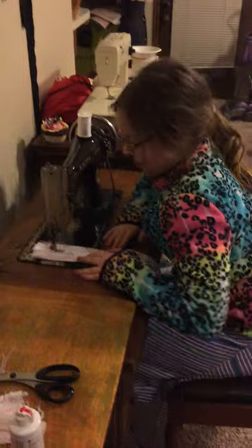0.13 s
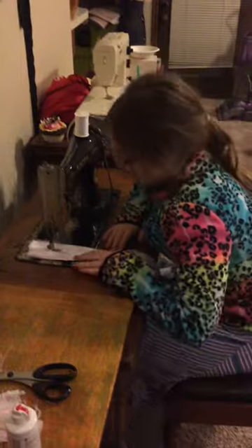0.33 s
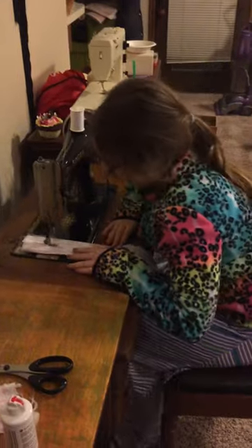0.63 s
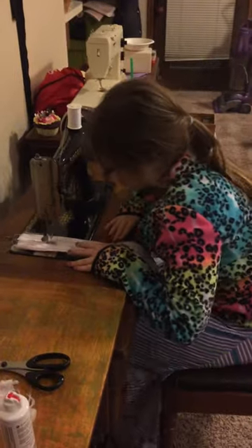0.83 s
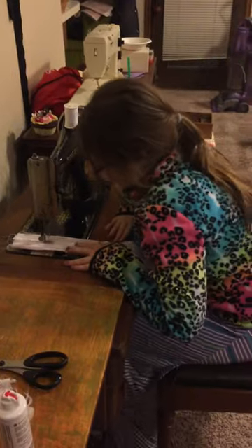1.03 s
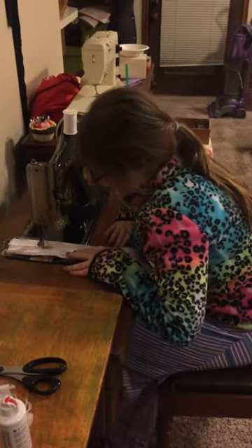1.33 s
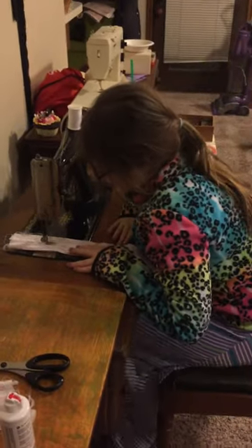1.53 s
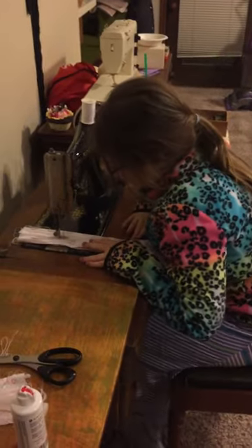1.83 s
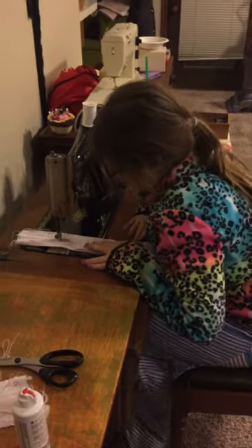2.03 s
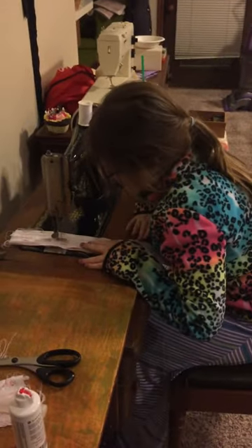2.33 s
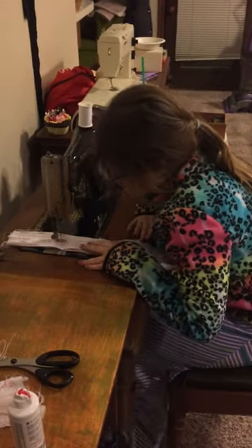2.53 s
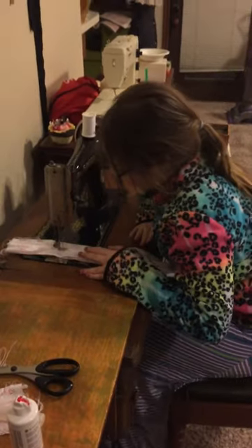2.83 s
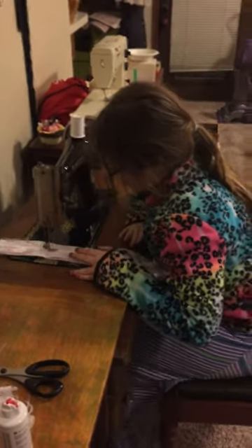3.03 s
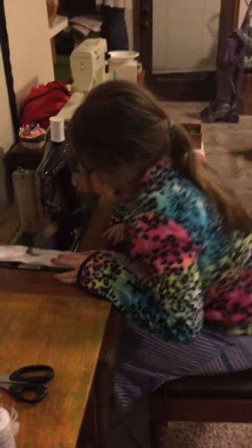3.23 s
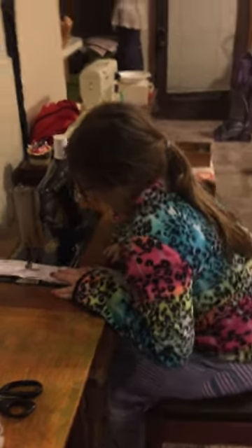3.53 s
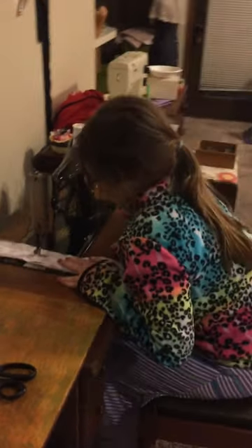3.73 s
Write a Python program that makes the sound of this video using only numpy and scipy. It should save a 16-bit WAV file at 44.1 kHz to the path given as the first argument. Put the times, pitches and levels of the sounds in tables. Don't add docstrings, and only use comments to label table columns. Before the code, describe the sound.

A treadle sewing machine, heard close by phone in a small room. Silence until 0.12 s, then a lever knock and thin, high shuttle squeaks, about eight stitches a second. From about 1.1 s it runs near ten, gears rattling harder, with needle-bar clacks, softer return scrapes, feed ticks and occasional bobbin chinks. Treadle knocks and wooden booms sit below. It slows slightly after 3.5 s, still running at the end.

```python
import sys
import numpy as np
from scipy import signal
from scipy.fft import rfft, irfft
from scipy.io import wavfile
from scipy.ndimage import uniform_filter1d

SR = 44100
rng = np.random.default_rng(int(sys.argv[2]) if len(sys.argv) > 2 else 0)


def inscribe(sig):
    pcm = np.round(np.clip(np.atleast_2d(sig).T, -1, 1) * 32767)
    wavfile.write(sys.argv[1], SR, pcm.astype(np.int16))


def invert_db(x):
    u = np.asarray(x, float) / 20
    return 10 ** u


N = 171549

# (frequency [Hz], width [Hz], level [dB])
IRON_MODES = [(568, 16, 6), (721, 51, 5.5), (1120.5, 18, 9.5), (1360, 154, 10), (1600, 23, -13.5),
              (2480, 180, 6), (3700, 150, 14.5), (4220, 110, -6), (5540, 110, 6.5), (5810, 130, 4)]
# (frequency [Hz], width [Hz], level [dB])
WOOD_MODES = [(96, 8.3, -21), (129, 20.6, -6), (167.4, 27, -5.5), (268.8, 18.5, 2), (298.7, 18.5, -0.5),
              (348.5, 35, -5.5)]
# (frequency [Hz], level [dB])
REGIONS = [
    [(1200, 0), (2000, -30)],
    [(1000, -30), (1600, 0), (3500, 0), (5000, -30)],
    [(3000, -30), (4200, 0), (7500, 0), (9500, -30)],
    [(6500, -30), (8500, 0)],
]


def level(x, db):
    return x * invert_db(db) / np.sqrt(np.mean(x ** 2))


def colour(x, points, tilt_db=0.):
    octaves = np.log2(np.arange(N // 2 + 1) * SR / N + 1)
    hz, db = np.array(points).T
    gain_db = np.interp(octaves, np.log2(hz), db) + tilt_db * (octaves - 12)
    return irfft(rfft(x) * invert_db(gain_db), N)


def ring(x, modes, flip=-1):
    out = 0
    for k, (hz, width_hz, db) in enumerate(modes):
        b, a = signal.iirpeak(hz, hz / width_hz, fs=SR)
        out = out + flip ** k * invert_db(db) * signal.lfilter(b, a, x)
    return out


def walk(rate_hz):
    k = int(SR / rate_hz)
    return level(uniform_filter1d(uniform_filter1d(rng.standard_normal(N), k), k), 0)


def bursts(times_s, db, rise_s, fall_s, hold_s=0.):
    t = np.arange(int(.25 * SR)) / SR
    rise = np.sin(np.pi / 2 * np.clip(t / rise_s, 0, 1)) ** 2
    shape = rise * np.exp(-np.maximum(t - rise_s - hold_s, 0) / fall_s)
    spikes = np.zeros(N)
    at = np.clip((times_s * SR).astype(int), 0, N - 1)
    np.add.at(spikes, at, invert_db(db) * (times_s * SR < N))
    return np.maximum(signal.fftconvolve(spikes, shape)[:N], 0)


def band(hz, width_hz):
    mode = [(hz, width_hz, 0)]
    return level(ring(ring(rng.standard_normal(N), mode), mode), -1.0)


def slap(at_s, db, length_s, tilt_db, patchy_db):
    # (frequency [Hz], level [dB])
    contact_colour = [(200, -38.5), (600, -14.5), (1300, 2), (2500, -2.5), (5000, -9), (8000, -11.5),
                      (12000, -18.5), (15500, -28.5)]
    uneven = rng.standard_normal((4, len(at_s)))
    late_s = .002 * rng.standard_normal((4, len(at_s)))
    out = 0
    for region, u, late in zip(REGIONS, uneven, late_s):
        hit = bursts(at_s - length_s / 2 + late, db + patchy_db * u, .003, length_s / 2, length_s / 2)
        out = out + colour(hit * rng.standard_normal(N), region)
    return colour(out, contact_colour, tilt_db)


def pings(events, gain_db, fall_s, noise_db):
    s, db, hz = np.array(events).T[:, :, None]
    lag = np.arange(int(.05 * SR)) / SR
    rough = uniform_filter1d(rng.standard_normal((len(s), len(lag))), size=24, axis=1) * 5 * invert_db(noise_db)
    envelope = invert_db(db + gain_db) * np.clip(lag / .003, 0, 1) * np.exp(-lag / fall_s)
    grain = envelope * (1 + rough) * np.sin(2 * np.pi * hz * lag)
    out = np.zeros(N + len(lag))
    np.add.at(out, ((s - .001) * SR).astype(int) + np.arange(len(lag)), grain)
    return out[:N]


def table_top(effort):
    # (time [s], level [dB])
    thumps = [(0.121, -33), (0.257, -36), (0.46, -33.5), (0.588, -43), (0.654, -33), (0.757, -37),
              (0.809, -33), (1.154, -29.5), (1.24, -27.5), (1.371, -26), (1.465, -27), (1.551, -30),
              (1.638, -27.5), (1.741, -27), (1.795, -28), (1.906, -20), (2.039, -33.5), (2.209, -26.5),
              (2.266, -34), (2.369, -27), (2.469, -29), (2.587, -31), (2.68, -32), (2.73, -38),
              (2.969, -30), (3.126, -28), (3.155, -54), (3.235, -29.5), (3.34, -33.5), (3.413, -36),
              (3.516, -30), (3.59, -32), (3.637, -27.5), (3.688, -42), (3.737, -34), (3.803, -28)]
    s, db = np.array(thumps).T
    push = bursts(s - .004, db, rise_s=.006, fall_s=.007, hold_s=.027)
    board_hz = 272.2 * (1 + .032 * walk(39.5))
    board = invert_db(-7) * push * np.sin(2 * np.pi * np.cumsum(board_hz) / SR)
    boom = level(ring(push * rng.standard_normal(N), WOOD_MODES), -45.5)
    rumble = level(ring(rng.standard_normal(N), WOOD_MODES), -39)
    return board + boom + effort * rumble


def rattle(turns):
    # (frequency [Hz], level [dB])
    gear_colour = [(40, -7), (150, 1), (480, -5.5), (1300, -1), (4900, -12.5), (7700, -15), (13000, -26),
                   (15500, -30)]
    contacts_per_s, spread_db = 9000, 1
    cycle_db, peak_turn = .5, .074
    together_db = 1 * walk(54) + cycle_db * np.cos(2 * np.pi * (turns - peak_turn))
    bed = 0
    for region in REGIONS:
        hits = (rng.random(N) < contacts_per_s / SR) * rng.standard_normal(N)
        clicks = hits * invert_db(spread_db * rng.exponential(1, N))
        bed = bed + colour(clicks * invert_db(together_db + 2 * walk(19.6)), region)
    bed = colour(bed, gear_colour)
    return level(bed + invert_db(-4.5) * ring(bed, IRON_MODES, .73), -35.5)


def treadle(t):
    # (time [s], level [dB], pitch [Hz])
    swings = [(0.255, -23, 345), (0.457, -26, 283), (0.808, -22, 350), (0.989, -24, 291), (1.309, -25, 288),
              (1.467, -29, 269), (1.789, -23.5, 363), (1.908, -24.5, 310), (2.241, -25.5, 369),
              (2.367, -22, 283), (2.682, -25, 272), (2.86, -26.5, 280), (3.127, -25.5, 358),
              (3.332, -25, 264), (3.59, -24, 283), (3.736, -25, 291)]
    s, db, hz = np.array(swings).T
    t60_s = .08
    knock = bursts(s - .006, db - 6, rise_s=.008, fall_s=t60_s / np.log(1000), hold_s=.012)
    pitch_hz = hz[np.clip(np.searchsorted(s, t) - 1, 0, None)] * (1 + .0273 * walk(61.5))
    boom = ring(knock * rng.standard_normal(N), WOOD_MODES + [(538, 180, -9.5)])
    boom = level(boom, 0) * np.std(knock) * invert_db(-4.5)
    return knock * np.sin(2 * np.pi * np.cumsum(pitch_hz) / SR) + boom


def lever_knocks():
    # (time [s], level [dB], pitch [Hz])
    knocks = [(0.1209, -23, 2280), (0.133, -20.5, 1945), (0.21, -26, 2520), (0.3608, -23, 2770),
              (0.5938, -22, 1310), (0.6163, -11.5, 2460), (0.6455, -15.5, 1142), (0.7482, -14.5, 1620),
              (0.939, -16, 1110), (1.0832, -23, 2446), (1.1565, -21, 3630), (1.2483, -19, 2480),
              (1.3436, -16.5, 1127), (1.4409, -16, 1146), (1.4668, -15, 1685), (1.617, -14, 2290),
              (1.6575, -17, 1360), (1.734, -18, 1118), (1.8429, -18, 1360), (2.036, -20, 1360),
              (2.1183, -22, 1360), (2.2076, -15.5, 1360), (2.271, -20, 1131), (2.3527, -14, 1110),
              (2.4935, -20, 1340), (2.5547, -18, 1773), (2.5793, -19, 1120), (2.6453, -22, 1130),
              (2.6707, -20, 1495), (2.7398, -16, 2404), (2.7674, -20, 1561), (2.8367, -17, 1115),
              (2.938, -18, 1360), (2.9629, -30, 1800), (3.0345, -14, 1660), (3.137, -13.5, 1100),
              (3.2028, -17, 1122), (3.3016, -20, 1370), (3.329, -22, 1580), (3.4043, -18, 980),
              (3.4338, -15.5, 1490), (3.499, -21.5, 2370), (3.7096, -23, 2520), (3.7306, -19, 1767),
              (3.8571, -37, 1120)]
    return pings(knocks, gain_db=-8, fall_s=.005, noise_db=0)


def bobbin_chinks():
    # (time [s], level [dB], pitch [Hz])
    chinks = [(0.1199, -42, 6400), (0.3402, -25, 6220), (0.3618, -33, 5850), (0.4272, -25, 5730),
              (0.89, -26, 5920), (1.1115, -28, 5460), (1.6157, -25, 5460), (1.6642, -23, 6000),
              (2.0566, -23, 5850), (2.9559, -26, 5980), (3.0553, -18.5, 5810), (3.2353, -37, 5470),
              (3.5289, -29, 5400), (3.8075, -26.5, 5100)]
    return pings(chinks, gain_db=-1, fall_s=.0056, noise_db=3)


def clacks(start_s, turn_s, force_db):
    # (time [s], level [dB])
    ticks = [(0.2483, -31), (0.3634, -22.5), (0.487, -29), (0.6156, -20), (0.7196, -26), (0.828, -25),
             (0.9409, -27.5), (1.0522, -46), (1.1605, -19), (1.2526, -19), (1.3444, -23.5),
             (1.4407, -23), (1.541, -23.5), (1.6336, -24), (1.7168, -36), (1.814, -22),
             (1.9097, -27.5), (2.0094, -27.5), (2.0967, -29),
             (2.1794, -30), (2.275, -22), (2.3698, -22), (2.4689, -22), (2.5573, -30.5),
                  (2.646, -27.5), (2.742, -22.5), (2.8383, -24.5), (2.936, -23), (3.0224, -26),
                  (3.1083, -23), (3.204, -25.5), (3.305, -24.5), (3.406, -21.5), (3.5006, -19.5),
                  (3.5935, -26.5), (3.7125, -26.5), (3.8265, -26)]
    # (place in turn [0-1], level [dB], length [s], tilt [dB/octave])
    slaps = [
        (0.084, -31.5, 0.015, 2.3),
        (0.338, -34, 0.0073, 3),
        (0.604, -34.5, 0.0052, 2),
    ]
    s, tick_db = np.array(ticks).T
    out = slap(s - .002, tick_db - 5.5, length_s=.0071, tilt_db=4.5, patchy_db=1)
    for place, db, length_s, tilt_db in slaps:
        scatter_db = 1 * rng.standard_normal(len(start_s))
        out = out + slap(start_s + place * turn_s, db + force_db + scatter_db, length_s, tilt_db, patchy_db=2)
    return invert_db(9) * (out + invert_db(-5.5) * ring(out, IRON_MODES, .96))


def late_squeaks():
    # (time [s], level [dB], pitch [Hz])
    saved = [
        (1.4945, -27, 7000),
        (2.606, -28.5, 7160),
    ]
    tone = pings(saved, gain_db=2.4, fall_s=.011, noise_db=3)
    octave = pings(np.array(saved) * [1, 1, 2], gain_db=-1, fall_s=.0056, noise_db=3)
    return tone + octave


def squeak(t, start_s, turn_s, db, octave_db, hz):
    # (frequency [Hz], level [dB])
    race_edges = [(6000, -12), (6600, 0), (7300, 0), (7650, -20)]
    race_hz, squeak_s, sag_hz_per_s, wobble_hz, flutter_db = 6955, .012, 9400, 140, 3.5
    k = np.clip(np.searchsorted(start_s - .004, t) - 1, 0, None)
    since_s = t - start_s[k]
    falling_hz = hz[k] - sag_hz_per_s * (since_s - squeak_s / 2)
    pitch_hz = np.where(since_s < 1.5 * squeak_s, falling_hz, race_hz)
    phase = 2 * np.pi * np.cumsum(pitch_hz + wobble_hz * walk(400)) / SR

    back_s, back_db = start_s + .339 * turn_s, db - 12
    low = bursts(start_s - .004, db + 1.0, .0096, .0052, .0032)
    low = low + bursts(back_s - .004, back_db, .0035, .0024, .014)
    high = bursts(start_s - .0034, db + octave_db, .0022, .0011, .0091)
    high = high + bursts(back_s - .004, back_db + octave_db - 2.5, .0034, .0035, .0072)
    drag = bursts(start_s, db - 16, .012, .029)

    rasp = band(race_hz, 600)
    tone = low * (invert_db(flutter_db * walk(370)) * np.sin(phase) + invert_db(-7) * rasp) + drag * rasp
    octave = invert_db(flutter_db * walk(380)) * np.sin(2 * phase) + invert_db(-4) * band(2 * race_hz, 1100)
    return invert_db(-6) * colour(tone, race_edges) + invert_db(-3) * high * octave


def room(x):
    t60_s, treble_t60_s, tail_db = .35, .17, -8.5
    lag = np.arange(int(.4 * SR)) / SR
    air = rng.standard_normal(len(lag)) * np.clip(lag / .0098, 0, 1)
    soft = signal.sosfilt(signal.butter(4, 9500, fs=SR, output="sos"), air)
    tail = soft * invert_db(-60 * lag / t60_s) + (air - soft) * invert_db(-60 * lag / treble_t60_s)
    tail = tail / np.sqrt(np.sum(tail ** 2))
    return x + invert_db(tail_db) * signal.fftconvolve(x, tail)[:N]


def scene():
    # (time [s], squeak level [dB], octave re squeak [dB], pitch [Hz])
    stitches = [(0.1376, -19, -9, 6960), (0.2634, -39, -9, 6646), (0.387, -18.5, -6, 7030),
                (0.5146, -26.5, -23, 6810), (0.6423, -17, -11, 7150), (0.7434, -17, -8, 7050),
                (0.8522, -18.5, -9, 6900), (0.963, -19.5, -5.5, 7090), (1.0776, -26.5, -21, 6780),
                (1.1789, -13.5, -7.5, 7050), (1.27, -17, -9.5, 6690), (1.3635, -15.5, -8.5, 7085),
                (1.4606, -28, -12, 7090), (1.5648, -21.5, -18, 6880), (1.6562, -12.5, -8, 6810),
                (1.7423, -14, -6.5, 6910), (1.8358, -21, -17, 6946), (1.929, -16.5, -7, 7040),
                (2.029, -14.5, -5, 7070),
                (2.1238, -22, -13, 6790), (2.2021, -14.5, -8, 6870), (2.294, -15, -7, 6830),
                     (2.392, -15.5, -11, 7050), (2.4928, -20, -16, 6790), (2.5827, -28.5, -4, 7120),
                     (2.665, -15.5, -8.5, 7070), (2.763, -13, -8, 6955), (2.8601, -15, -11, 7090),
                     (2.9569, -17, -4.5, 6810), (3.0436, -15.5, -9.5, 6840), (3.1297, -18.5, -7, 7030),
                     (3.226, -17, -7, 7040), (3.322, -16, -11, 7080), (3.4271, -13, -11, 6840),
                     (3.521, -16, -9, 7180), (3.6232, -21.5, -9, 7300), (3.7334, -22.5, -8, 7260),
                     (3.8528, -18.5, -10.5, 7020)]
    # (time [s], effort [dB])
    effort_curve = [(.13, -37.5), (.2, -37.5), (.32, -35.5), (.55, -36.5), (1.0, -34), (1.5, -34),
                    (2.0, -33), (2.5, -33.5), (3.05, -34), (3.45, -35), (3.68, -37), (3.89, -34)]
    t = np.arange(N) / SR
    start_s, db, octave_db, hz = np.array(stitches).T
    turn_s = np.append(np.diff(start_s), .118)
    effort_s, effort_db = np.array(effort_curve).T
    effort = invert_db(np.interp(t, effort_s, effort_db) + 33.5)
    force_db = np.interp(start_s, effort_s, effort_db) + 35 + .044 * (db + 16)

    gears = effort * rattle(np.interp(t, start_s, np.arange(len(start_s))))
    near = treadle(t) + lever_knocks() + bobbin_chinks() + late_squeaks()
    near = near + squeak(t, start_s, turn_s, db, octave_db, hz)
    return (table_top(effort) + gears + room(clacks(start_s, turn_s, force_db)) + room(near))[None]


def band_limit(x):
    return signal.sosfilt(signal.butter(12, 15980, fs=SR, output="sos"), x)


def record(dry):
    start_s, top_hz, bass_hz = .1195, 15250, 50
    x = signal.sosfilt(signal.ellip(10, .2, 80, top_hz, fs=SR, output="sos"), dry)
    x = signal.sosfilt(signal.butter(3, bass_hz, "high", fs=SR, output="sos"), x)
    mix = x * (np.arange(N) / SR > start_s)
    return band_limit(mix)


dry = scene()
out = record(dry)
inscribe(out)
```